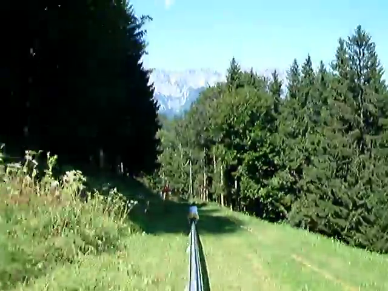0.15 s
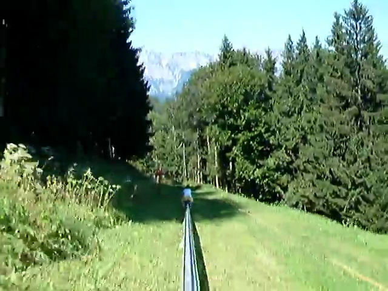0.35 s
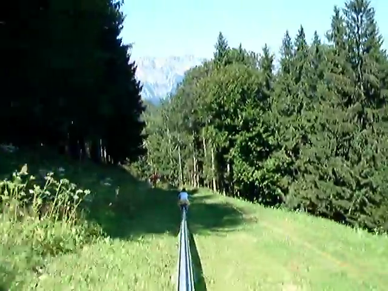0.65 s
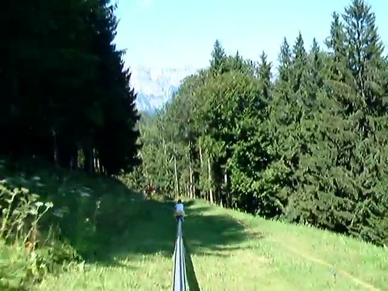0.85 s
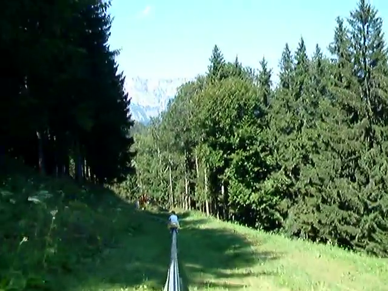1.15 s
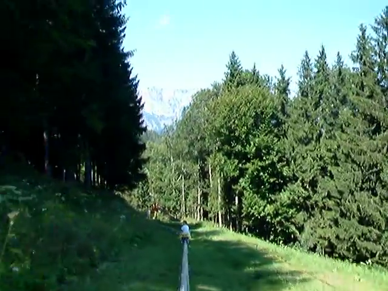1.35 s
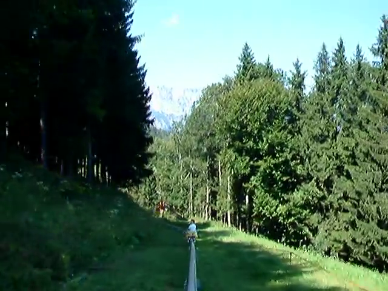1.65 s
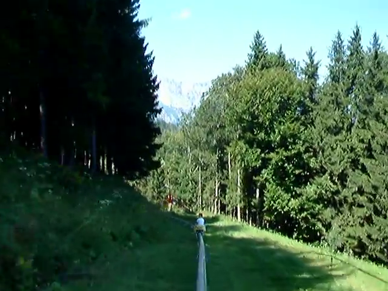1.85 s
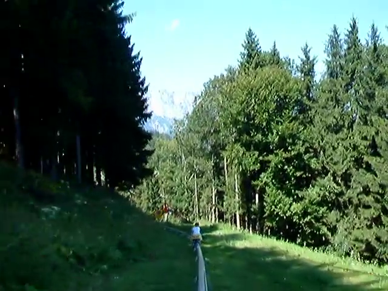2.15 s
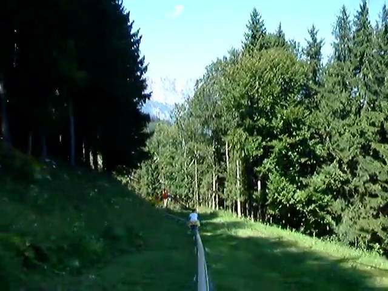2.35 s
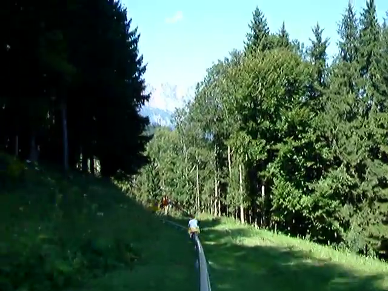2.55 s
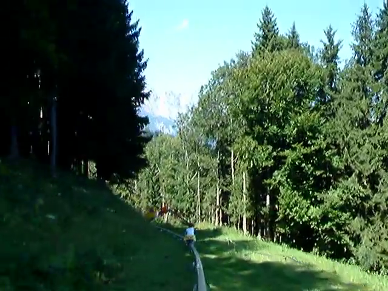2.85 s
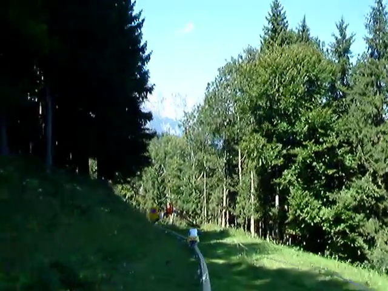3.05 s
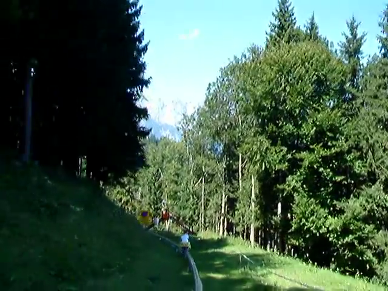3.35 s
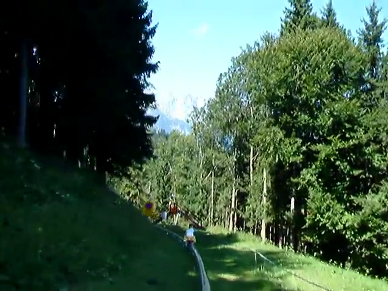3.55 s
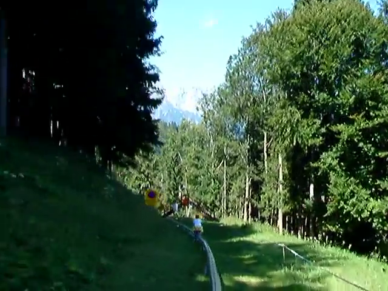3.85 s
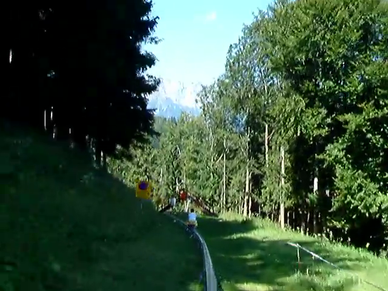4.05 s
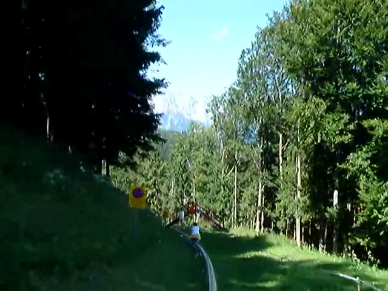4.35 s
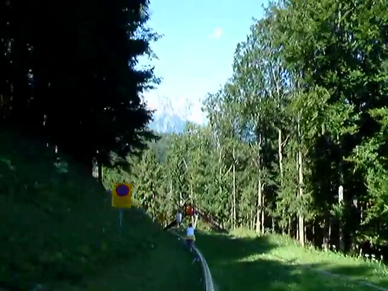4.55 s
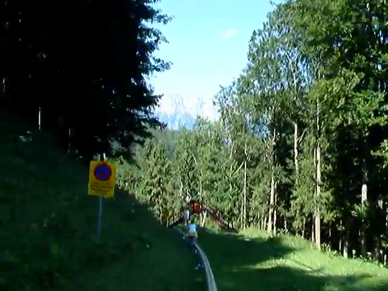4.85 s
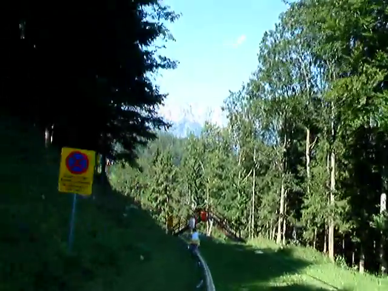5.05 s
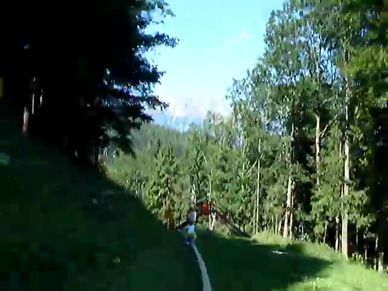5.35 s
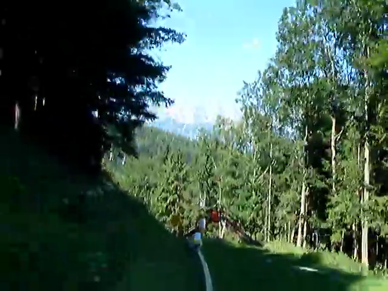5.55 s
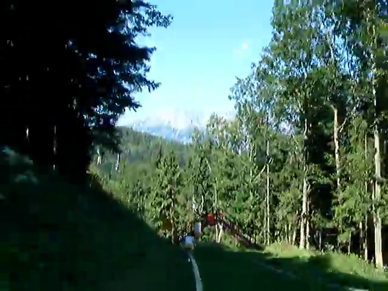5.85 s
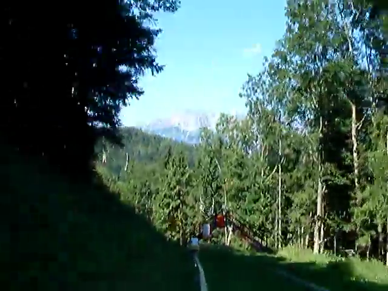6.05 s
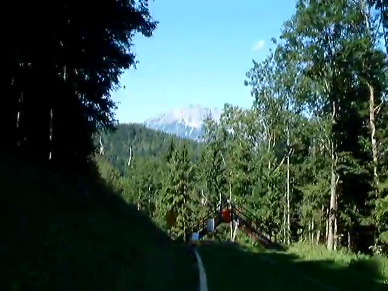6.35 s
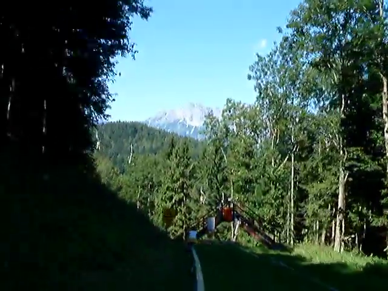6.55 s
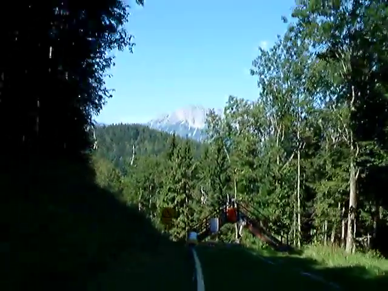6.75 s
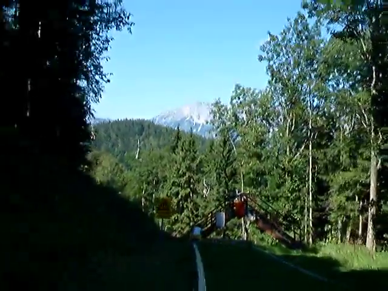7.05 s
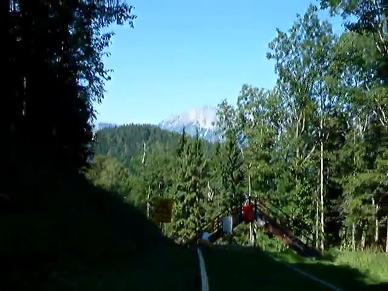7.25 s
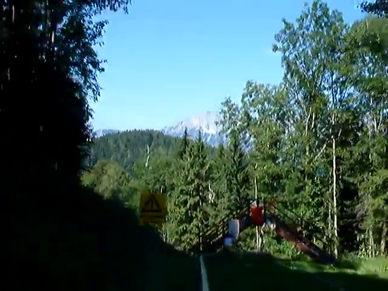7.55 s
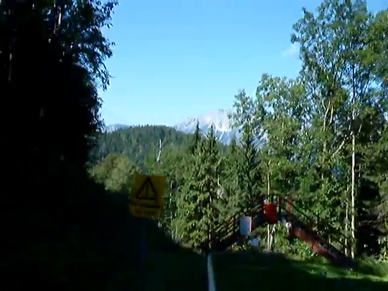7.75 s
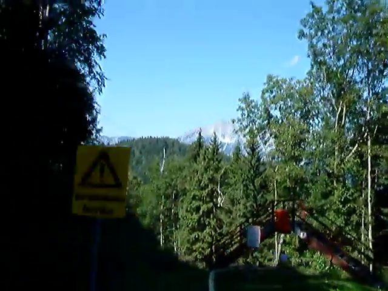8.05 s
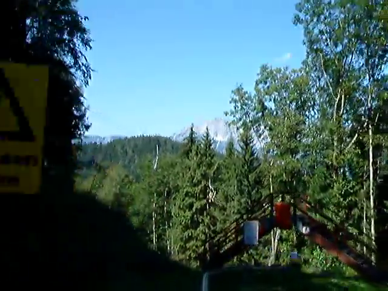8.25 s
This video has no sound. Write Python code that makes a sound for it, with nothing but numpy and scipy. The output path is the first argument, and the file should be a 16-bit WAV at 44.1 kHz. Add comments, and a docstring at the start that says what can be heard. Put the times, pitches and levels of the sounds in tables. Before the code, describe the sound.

Constant rushing headwind batters a tiny microphone, deep rumble beneath flurries of crackling pops, burying every other sound of the sled ride.

```python
"""A smooth low rumble runs throughout under dense sharp snaps that bunch in flurries, with scattered ticks.
This is the head wind on a small microphone that rides a sled down a metal rail; it buries everything else.
Large eddies are filtered noise, small ones random pulses of mostly suction, and loud snaps short wave packets.
The strongest suction pops drive the narrow-band recorder past full scale, which ticks."""
import sys
import numpy as np
from scipy import signal
from scipy.fft import rfft, irfft
from scipy.io import wavfile

SR = 44100
rng = np.random.default_rng(int(sys.argv[2]) if len(sys.argv) > 2 else 0)


def magnitude_from_level(level_db):
    """Linear magnitude for a level in decibels (20 dB per decade)."""
    exponent = np.asarray(level_db, float) / 20
    return 10 ** exponent


def dump_mix(stems):
    """Bounce the given channels to the path in sys.argv[1] as a 16-bit WAV at rate SR."""
    frames = np.atleast_2d(stems).T  # one column per channel
    limited = np.clip(frames, -1, 1)  # hard clip at full scale
    pcm = np.round(limited * 32767).astype(np.int16)
    wavfile.write(sys.argv[1], SR, pcm)


N = 370881

# the recorder's standing offset and its lowest value, both linear
OFFSET, FULL_SCALE = .032, -.707


def rms_one(x):
    """Normalization: a signal divided by its root mean square has unit power."""
    return x / np.sqrt(np.mean(x ** 2) + 1e-20)


def drift(rate_hz):
    """Slow random modulation: noise through two equal one-pole low-passes, run in for a second; rms 1."""
    r = np.exp(-2 * np.pi * rate_hz / SR)
    noise = rng.standard_normal(N + SR)
    return rms_one(signal.lfilter([1], [1, -2 * r, r * r], noise)[SR:])


def coloured(x, spectrum):
    """Zero-phase filtering: a real gain on the spectrum keeps pulses symmetric; rms 1."""
    hz, db = np.transpose(spectrum)
    grid_hz = np.fft.rfftfreq(N, 1 / SR) + 1  # kept off zero for the logarithm
    gain = magnitude_from_level(np.interp(np.log(grid_hz), np.log(hz), db))
    return rms_one(irfft(rfft(x) * gain, N))


def bells(rows, width_s):
    """Gaussian modulation: bell-shaped changes in dB, summed, at the times of a table."""
    t = np.arange(N) / SR
    return sum(db * np.exp(-((t - s) / width_s) ** 2) for s, db in rows)


def narrow_band(x):
    """Band limitation: the recorder's steep top cut, run both ways so that it adds no delay."""
    stop_hz = 4966
    return signal.sosfiltfilt(signal.cheby2(9, 45, stop_hz, fs=SR, output="sos"), x)


def lulls():
    """Amplitude modulation: the level of the wind dips for a moment; returns dB."""
    # Each row: centre in seconds, change in dB, of which rumble and flutter take a share.
    dips = [(0.915, -1.5), (0.98, -5.5), (1.235, -6), (1.47, -2.5), (1.82, -5), (7.72, -5.5), (8.335, -6)]
    return bells(dips, 0.011)


def treble_swing():
    """Spectral modulation: the treble of the head wind flickers about its mean; returns dB."""
    # Each row: time in seconds, treble level in dB, of which only the departure from the mean counts.
    treble = [(0.0, -31), (0.02, -35), (0.26, -33.5), (0.3, -36), (0.33, -30), (0.44, -38), (0.51, -31),
              (0.63, -35.5), (0.72, -32), (0.77, -40.5), (0.79, -28), (0.82, -39.5), (0.86, -34),
              (0.91, -41), (0.94, -31), (0.98, -41), (1.03, -31.5), (1.1, -35), (1.15, -29.5),
              (1.17, -36.5), (1.22, -34.5), (1.24, -47.5), (1.26, -37), (1.31, -32), (1.45, -39.5),
              (1.5, -32.5), (2.08, -36), (2.13, -30.5), (2.2, -38), (2.22, -32), (2.39, -39.5),
              (2.69, -31.5), (2.74, -36.5), (3.04, -32.5), (3.16, -37), (3.21, -30.5), (3.61, -34.5),
              (3.75, -30.5), (3.77, -35.5), (3.89, -30), (4.0, -39.5), (4.17, -30.5), (4.52, -36),
              (5.08, -34.5), (5.13, -31), (5.2, -34.5), (6.11, -32.5), (6.32, -35.5), (6.37, -28.5),
              (6.51, -42), (6.6, -28), (6.65, -34.5), (7.1, -33), (7.17, -39), (7.33, -33), (7.73, -34.5),
              (8.06, -30.5), (8.32, -30.5), (8.34, -39.5), (8.41, -34.5)]
    s, db = np.transpose(treble)
    level_db = np.interp(np.arange(N) / SR, s, db)
    return level_db - level_db.mean()


def rumble(lull_db):
    """Superposition: many large eddies overlap into smooth noise, with slightly pointed crests."""
    # Large eddies through the microphone's bass cut.
    # Each row: frequency in Hz, relative spectral level in dB per Hz.
    large_eddies = [(15, -46.5), (25, -44.5), (33, -43.5), (43, -26.5), (180, -0.5), (305, 3), (520, -4.5),
                    (1000, -11.5), (1300, -28.5), (2200, -120)]
    level_db, lull_share, crest_peaking = -16, 0.54, 0.75
    gain = magnitude_from_level(level_db + lull_share * lull_db + 0.3 * drift(60))
    swing = gain * coloured(rng.standard_normal(N), large_eddies)
    # the square lifts crests and troughs alike: crests sharpen, troughs flatten
    return swing + crest_peaking * signal.filtfilt(*signal.butter(2, 130, "high", fs=SR), swing ** 2)


def flutter(treble_db, lull_db, swing):
    """Shot noise: small eddies snap at random, mostly as suction, bunched in flurries over a thin hiss."""
    # Small eddies. Each row: frequency in Hz, relative spectral level in dB per Hz.
    small_eddies = [(100, -30), (250, 2), (500, 1.5), (800, -0.5), (1300, -1.5), (2000, -7), (3000, -17.5),
                    (3600, -24), (4200, -31), (6000, -30)]
    # Short flurries. Each row: centre in seconds, change in dB (a few are negative).
    flurry_rows = [(0.523, 6), (0.545, 8), (0.793, 9), (1.258, 2), (1.983, 8), (2.469, -3), (2.554, -2),
                   (4.088, -0.5), (4.366, 10), (5.842, 7)]
    snaps_per_s, size_spread_db, suction_share = 1800, 4, .85
    level_db, edge_db, lull_share = -18.5, -2.13, .45
    treble_share = 0.5  # share of the treble's swing that the whole flutter takes; the rest is sharpness

    # eddies break up as the rumble climbs out of a trough
    ahead = np.roll(swing, -round(0.00095 * SR))
    behind = np.roll(swing, round(.0004 * SR))
    climb = rms_one(ahead - behind)
    bunching = magnitude_from_level(0.26 * drift(13) + 1.5 * drift(120) + 4.5 * np.tanh(climb / 1.4))

    sizes = magnitude_from_level(size_spread_db * np.minimum(rng.exponential(1, N), 2.4))
    signs = np.where(rng.random(N) < suction_share, -1, 1)
    snaps = rms_one(sizes * signs * (rng.random(N) < snaps_per_s / SR))
    thin_hiss = magnitude_from_level(-15) * rng.standard_normal(N)
    air = coloured(bunching * (snaps + thin_hiss), small_eddies)
    body = signal.filtfilt(*signal.butter(1, 2200, fs=SR), air)

    # faster flow breaks the eddies finer: more of the edge above the body
    sharp_db = edge_db + (1 - treble_share) * treble_db
    sharp_db = sharp_db + 0.5 * drift(30) + 1.6 * drift(60) + 3.0 * drift(160)
    edge = magnitude_from_level(sharp_db + 1.9 * np.tanh(climb)) * (air - body)

    # the finest crackle comes and goes on its own
    finest = signal.sosfiltfilt(signal.butter(3, 3100, "high", fs=SR, output="sos"), edge)
    crackle = magnitude_from_level(-1.1 + 1.5 * drift(40) + 3.0 * drift(200)) * finest
    edge = edge - finest + crackle

    whole_db = level_db + treble_share * treble_db + lull_share * lull_db + bells(flurry_rows, 0.0032)
    return magnitude_from_level(whole_db) * (body + edge)


def cracks():
    """Wave packet: each loud snap is a narrow dip of suction between two small crests, leaning either way."""
    # The loudest single snaps. Each row: centre in seconds, envelope peak in dB, pitch in Hz.
    loud_snaps = [(0.0557, -5, 1750), (0.2636, -7.1, 2200), (0.3306, -8.5, 2170), (0.3693, -10.9, 2000),
                  (0.5138, -8, 1920), (0.5192, -9.5, 2030), (0.6069, -10.8, 2210), (0.7286, -5, 2090),
                  (1.0465, -12, 2160), (1.1475, -12, 2450), (1.2078, -11, 1900), (1.5244, -11, 1920),
                  (1.6004, -9, 1980), (1.6875, -4, 1700), (2.079, -10.0, 1970), (2.1226, -9.9, 2160),
                  (2.1523, -8, 1740), (2.243, -3, 1720), (2.929, -12, 1980), (2.9963, -13, 1900),
                  (3.0165, -16, 2060), (3.0561, -13, 2040), (3.2323, -8, 1920), (3.3061, -10, 2190),
                  (3.3935, -15, 1830), (3.4079, -13, 2070), (3.6859, -8, 1810), (3.7187, -9, 2200),
                  (3.7484, -8.6, 2150), (3.7551, -11, 1940), (3.8334, -10.7, 1790), (4.1272, -7, 2020),
                  (4.1595, -9.5, 2520), (4.1887, -8, 2230), (4.3637, -12, 1770), (4.811, -14, 1900),
                  (4.8349, -11.5, 2040), (5.1117, -14, 1840), (5.1377, -9, 2020), (5.1836, -13, 2170),
                  (5.2312, -10.1, 2100), (5.6026, -10, 2140), (5.9546, -10, 1940), (6.2995, -7.9, 1970),
                  (6.3688, -8, 2120), (6.3852, -9, 2070), (6.4283, -9, 1850), (6.5374, -11, 1870),
                  (6.6225, -10.9, 2100), (6.9133, -9.6, 1890), (7.0399, -10.5, 2130), (7.2924, -10.5, 2140),
                  (7.3184, -11, 1930), (7.4242, -11.5, 2120), (7.5646, -10, 1920), (7.7585, -10, 1910),
                  (7.8653, -9.7, 2060), (8.0303, -14, 1810), (8.0415, -15, 2060), (8.0735, -10.3, 2050),
                  (8.0904, -8.1, 2030), (8.0998, -7.9, 1890), (8.1425, -11, 2190), (8.1498, -11, 2030),
                  (8.1572, -12, 1940), (8.199, -16, 2180), (8.2462, -11, 1960), (8.26, -5, 1690),
                  (8.2773, -11, 2120), (8.3145, -11, 1790)]
    width_s, lean_rad = 0.00035, 0.81
    out = np.zeros(N + 200)
    t = np.arange(-100, 100) / SR
    for (s, db, hz), lean in zip(loud_snaps, rng.uniform(-1.1, 0.54, len(loud_snaps))):
        swings = -np.cos(2 * np.pi * hz * t + lean_rad * lean)
        at = round(s * SR)
        out[at:at + len(t)] += magnitude_from_level(db) * swings * np.exp(-(t / width_s) ** 2)
    return out[100:N + 100]


def pops(wind):
    """Pressure balance: a spike of suction at the bottom of one low swing shoves smaller eddies aside."""
    # Strong suction pops that overload the recorder.
    # Each row: centre in seconds, depth past full scale as a level in dB.
    overloads = [(0.0484, -30), (0.122, -32.5), (0.3194, -24), (0.6947, -23), (0.7906, -48), (1.061, -27),
                 (1.1379, -21.5), (1.186, -22), (1.314, -29), (1.504, -27.5), (1.6203, -40.5),
                 (1.707, -27.5), (1.8475, -44.5), (2.6441, -34), (2.9223, -23.5), (2.94, -31),
                 (2.9899, -22), (3.2561, -29.5), (3.3293, -23), (3.395, -49), (3.5517, -20),
                 (3.7998, -32.5), (4.186, -23), (4.1966, -40), (5.1099, -50.5), (5.1871, -28.5),
                 (5.3986, -41.5), (5.5198, -23), (5.529, -29.5), (5.7368, -33.5), (5.8422, -29),
                 (6.6023, -17.5), (6.8028, -31.5), (6.8175, -21), (6.8538, -36.5), (6.9893, -27),
                 (7.0596, -32.5), (7.15, -41.5), (7.9943, -33), (8.083, -31), (8.3954, -27)]
    # spike width and the swing's share of the depth, both at -28 dB; deeper pops are mostly spike
    width_at_28_ms, narrowing_ms_per_db = .25, 0.004
    swing_share, share_loss_per_db = 0.37, 0.4
    out = np.pad(wind, 200)
    t = np.arange(-200, 200) / SR
    swing = np.cos(2 * np.pi * 420 * (t - .00005)) * np.exp(-((t - .0002) / 0.0012) ** 2)
    shoved = np.exp(-(t / 0.00053) ** 4)
    flanks = (1 - shoved) * np.exp(-(t / .0018) ** 2)

    def balanced(pull):
        """Zero net impulse: the air pulled away piles up on both flanks."""
        return pull - flanks * pull.sum() / flanks.sum()

    for s, excess_db in overloads:
        width_ms = max(width_at_28_ms - narrowing_ms_per_db * (excess_db + 28), .1)
        spike = balanced(np.exp(-(t * 1000 / width_ms) ** 2 * 4))
        share = np.clip(swing_share - share_loss_per_db * (excess_db + 28), .1, .55)
        depth = OFFSET - FULL_SCALE + magnitude_from_level(excess_db)
        at = slice(round(s * SR), round(s * SR) + len(t))
        out[at] -= balanced(depth * share * swing + shoved * out[at])
        # the spike is as deep as it takes to pass full scale behind the top cut
        missing = depth + narrow_band(out[at])[200]
        out[at] -= spike * missing / narrow_band(spike)[200]
    return out[200:N + 200]


def scene():
    """Saturation: rumble, flutter and cracks bottom out on the capsule; only the pops pull past it."""
    capsule_limit = -.655
    treble_db = treble_swing()
    lull_db = lulls()
    low = rumble(lull_db)
    small = flutter(treble_db, lull_db, low)
    wind = np.maximum(low + small + cracks(), capsule_limit)
    return pops(wind)[None]


def low_pass(x):
    """Removes everything above the highest recorded frequency."""
    return signal.sosfilt(signal.butter(12, 15850, fs=SR, output="sos"), x)


def record(dry):
    """Clipping: the preamp cuts crests, a steep filter the top, full scale the troughs; a faint even hiss."""
    crest_limit, hiss_db = .655, -98
    narrow = narrow_band(np.minimum(dry + OFFSET, crest_limit))
    hiss = magnitude_from_level(hiss_db) * rng.standard_normal(N)
    return low_pass(np.maximum(narrow, FULL_SCALE) + hiss)


dry = scene()
out = record(dry)
dump_mix(out)
```